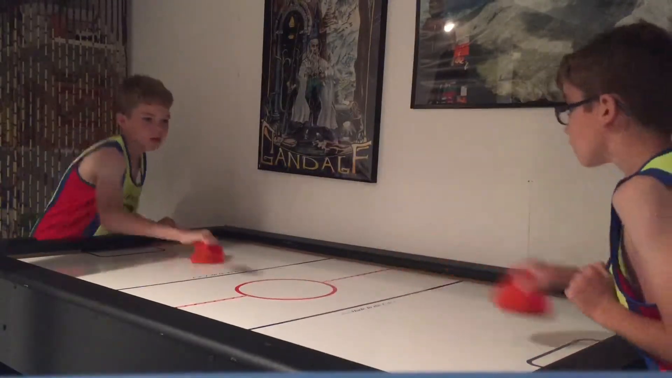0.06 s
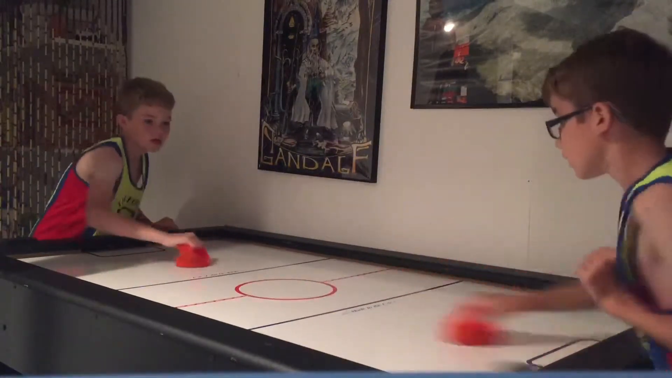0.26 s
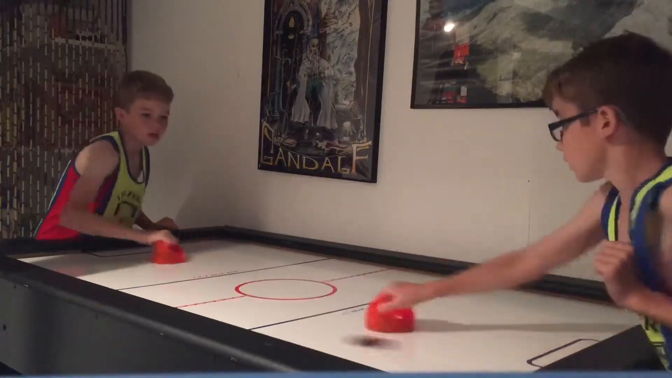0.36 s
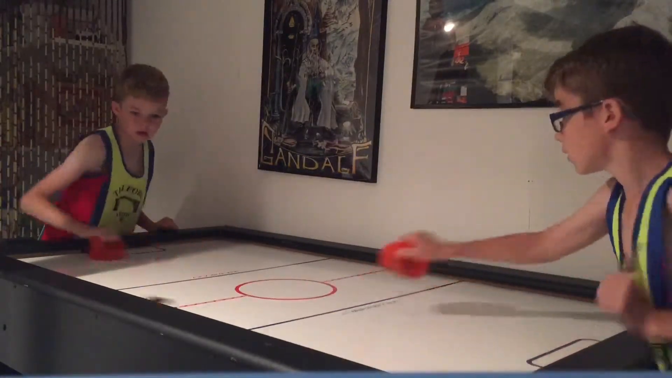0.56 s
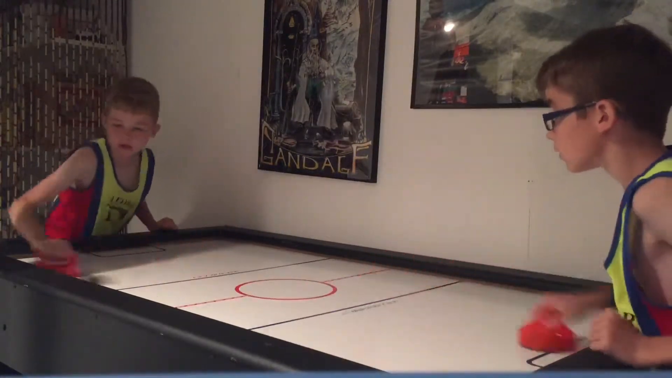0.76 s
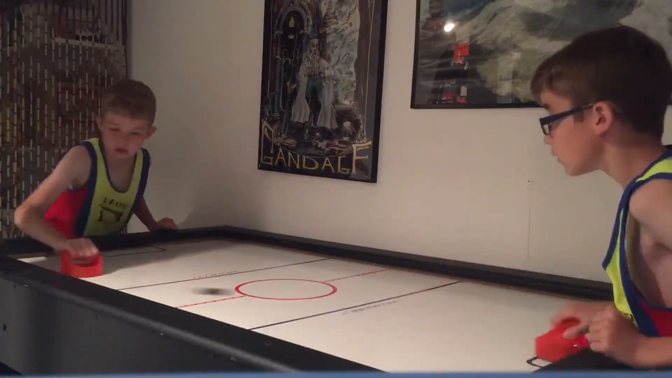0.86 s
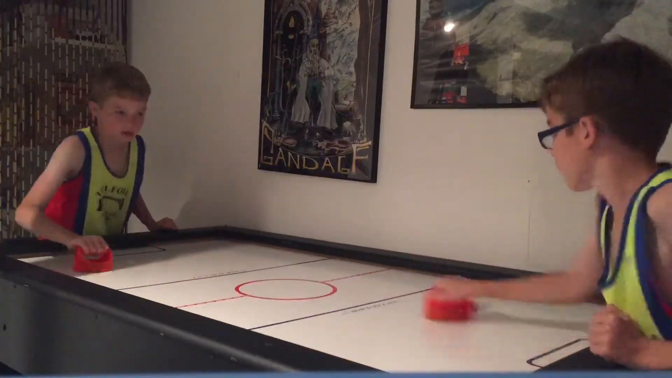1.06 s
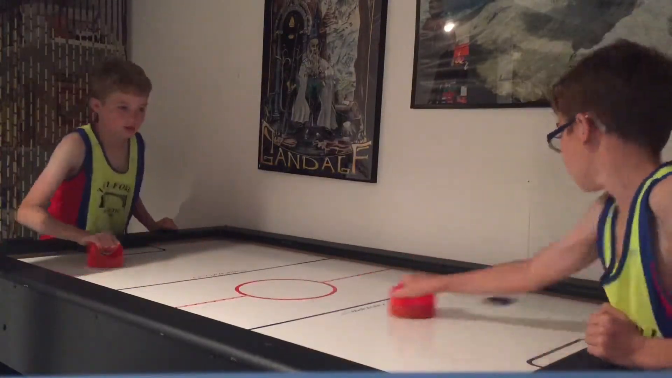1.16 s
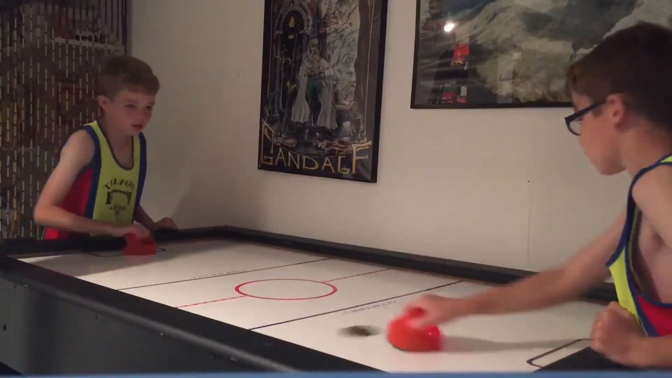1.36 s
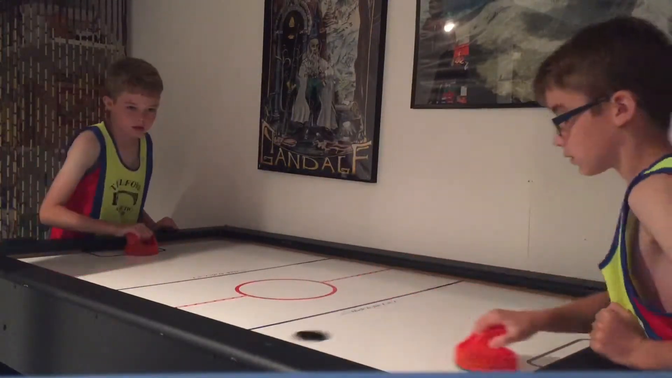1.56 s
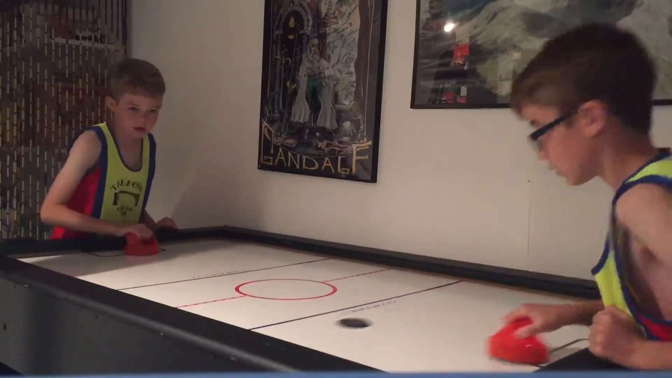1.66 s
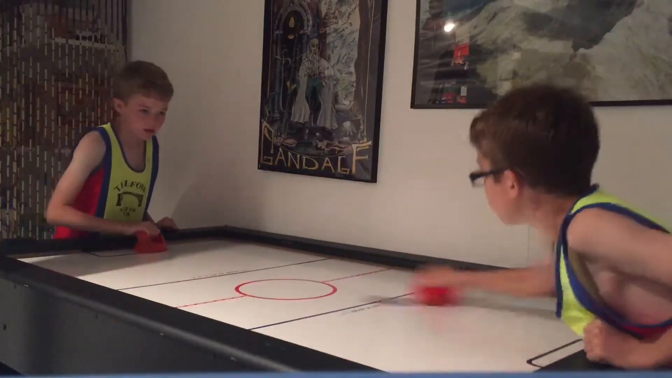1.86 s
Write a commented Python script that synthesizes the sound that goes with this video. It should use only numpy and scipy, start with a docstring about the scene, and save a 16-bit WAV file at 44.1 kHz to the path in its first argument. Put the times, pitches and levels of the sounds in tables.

```python
"""Air hockey in a hard-walled room.

A plastic puck is struck by mallets and bounces off the rails of an air table.
Every blow rings the cabinet, bed, rail, mallet and puck for an instant; the room draws it out.
The blower hisses and hums below, and the loudest blows overload the microphone."""
import sys
import numpy as np
from scipy import signal
from scipy.fft import rfft, irfft
from scipy.io import wavfile

SR = 44100
rng = np.random.default_rng(int(sys.argv[2]) if len(sys.argv) > 2 else 0)


def digitize_waveform(pressure):
    """Quantize a signal to 16-bit integers and store it at the path in sys.argv[1].

    Rows of a 2-D input are taken as channels; values are limited to [-1, 1].
    """
    field = np.atleast_2d(pressure).T
    bounded = np.clip(field, -1, 1)
    quanta = np.round(bounded * 32767).astype(np.int16)
    wavfile.write(sys.argv[1], SR, quanta)


N = 83790


def from_db(db):
    return 10 ** (np.asarray(db) / 20)


def unit_rms(x):
    return x / np.sqrt(np.mean(x ** 2) + 1e-20)


def at_hz(curve, hz):
    curve_hz, values = np.transpose(curve)
    return np.interp(np.log(hz), np.log(curve_hz), values)


def butter(x, kind, hz, order):
    return signal.sosfilt(signal.butter(order, hz, kind, fs=SR, output="sos"), x)


# Air hiss spectrum. Each row: frequency in Hz, relative level in dB.
HISS_SPECTRUM = [(30, -17), (130, 0), (250, -8), (470, 2), (700, 1.5), (1270, -0.5), (2500, -3), (3600, -8),
                 (4900, -22.5), (8100, -31), (12000, -40.5), (16000, -43)]
HISS_DB, HUM_DB, HUM_HZ, HUM_HALF_WIDTH_HZ = -37, -53.5, 90, 21


def blower():
    """Air hisses through the bed; the motor's wavering hum is a narrow band of noise."""
    hz = np.arange(N // 2 + 1) * SR / N + 1
    hiss = irfft(rfft(rng.standard_normal(N)) * from_db(at_hz(HISS_SPECTRUM, hz)), N)
    hum_band = 1 / (1 + ((hz - HUM_HZ) / HUM_HALF_WIDTH_HZ) ** 4)
    hum = irfft(rfft(rng.standard_normal(N)) * hum_band, N)
    return from_db(HISS_DB) * unit_rms(hiss) + from_db(HUM_DB) * unit_rms(hum)


# Room decay. Each row: frequency in Hz, t60 in seconds.
ROOM_DECAY = [(60, 0.82), (200, 0.73), (600, 0.51), (2000, 0.65), (5000, .7), (8000, 0.66), (11500, 0.43),
              (16000, 0.5)]
ROOM_RISE_S, ROOM_RISE_CYCLES = 0.015, 0.8


def room_tail():
    """The room's diffuse response builds and dies band by band; the bass builds later."""
    t = np.arange(SR) / SR
    white = rng.standard_normal((2, SR))
    edges_hz = 40 * 2 ** np.arange(0, 9.1, 0.75)
    tail = np.zeros(SR)
    for k, (low, high) in enumerate(zip(edges_hz, edges_hz[1:])):
        hz = np.sqrt(low * high)
        band = butter(white[k % 2], "band", [low, high], order=2)
        rise = 1 - np.exp(-t / (ROOM_RISE_S + ROOM_RISE_CYCLES / hz))
        tail += band * rise * from_db(-60 * t / at_hz(ROOM_DECAY, hz))
    return tail


ECHOES_PER_S, ECHO_RISE_S, DIRECT_DB = 5000, 0.0023, 14


def near_response(t60):
    """The direct sound, then a bright burst of reflections off the bed and the corner."""
    t = np.arange(SR) / SR
    arrivals = rng.random(SR) < ECHOES_PER_S / SR
    echoes = rng.standard_normal(SR) * arrivals * np.sqrt(SR / ECHOES_PER_S)
    rise = 1 - np.exp(-t / ECHO_RISE_S)
    near = echoes * rise * from_db(-60 * t / t60)
    near[0] = from_db(DIRECT_DB)
    near = butter(near + 1e-18, "high", hz=200, order=2)
    treble = butter(near, "high", hz=8000, order=1)
    return near + treble


def struck_body(modes, scatter_db=2, samples=8192):
    """A body rings as decaying sines of total energy 1; each blow excites them a little differently."""
    t = np.arange(samples) / SR
    hz, db, t60 = np.transpose(modes)[:, :, None]
    db = db + scatter_db * rng.standard_normal((8, 1))[:len(hz)]
    polarity = (-1.0) ** np.arange(len(hz))[:, None]
    envelopes = from_db(db - 60 * t / t60) / np.sqrt(t60)
    ring = np.sum(polarity * envelopes * np.sin(2 * np.pi * hz * t), axis=0)
    ring = butter(ring, "high", 0.75 * hz.min(), order=4)
    return ring / np.sqrt(np.sum(ring ** 2))


# Modes of the struck parts. Each row: frequency in Hz, relative level in dB, t60 in seconds.
CABINET_MODES = [(63, 11.5, 0.06), (83, 9.5, .12), (110, -24.5, .08)]
BED_MODES = [(162, -20, 0.027), (180.4, 3, 0.076), (228, -20, 0.023), (279.6, 6, 0.023), (359.7, 11, 0.06)]
RAIL_MODES = [(414, -4, 0.054), (491.4, 0.5, .04), (575.6, 6.5, 0.018), (639, 8, .04), (689, -0.5, 0.053)]
MALLET_BASE_MODES = [(759, -0.59, 0.0069), (1080, 0.94, 0.0067), (1176, -4.4, 0.06), (1544, -3, 0.0075)]
MALLET_MODES = [(1646, -5.5, 0.004), (2103, -3, 0.036), (2112, 5.5, 0.009), (2783, 2.5, 0.0036)]
PUCK_CLACK_MODES = [(2856, 8.5, 0.0074), (3111, 5.5, 0.0064), (3855, 0, 0.011), (3840, 2.5, 0.0021),
                    (4170, -3, .003)]
PUCK_RING_MODES = [(5630, -20, 0.0042), (6324, 22, .014), (6920, 25, 0.0091), (9690, 24.5, 0.0055),
                   (13300, -11, .006), (15700, -25, .005)]
CRACK_MODES = [(4170, 0.5, 0.0005), (5900, -2, 0.0013), (8300, -7, 0.0007), (10190, -3.5, 0.00035),
               (15100, -8, 0.00038)]
# Blows of the puck. Each row: start in seconds, levels in dB of cabinet, bed, rail, mallet base,
# mallet, puck clack, puck ring and crack, near sound over room in dB, near t60 in seconds.
PUCK_BLOWS = [(0.1056, -26, -16.5, -31.5, -21.5, -18, -18.5, -24, -22, 14.5, 0.035),
              (0.3196, -62, -27.5, -17, -12, -10, -24, -39.5, -27, 7.5, 0.048),
              (0.7717, -55, -47, -29, -27.5, -42, -52, -57, -60, 5, 0.046),
              (0.7911, -25, -15.5, -13.5, -16, -23, -38, -52.5, -23, 3, 0.021),
              (0.7938, -58, -59, -26.5, -22.5, -18, -16.5, -25.5, -24, 16, 0.039),
              (0.876, -38, -40, -22, -59, -49, -54, -60, -30, -16, 0.033),
              (1.128, -53, -25, -32, -25.5, -26, -23.5, -43, -34.5, 13, 0.025),
              (1.1871, -51, -56, -13, -14.5, -11, -15.5, -34, -27.5, 7, 0.06),
              (1.5408, -52, -47.5, -30.5, -23.5, -38, -28, -49.5, -41, 15.5, 0.013),
              (1.5472, -56, -48, -30, -33, -40.5, -32, -45, -47, 3, 0.019),
              (1.5443, -59, -41, -21, -26, -15.5, -31.5, -49, -42, 11.5, 0.028)]


def puck_blows():
    """Each blow rings table, mallet and puck, and sounds through the room from its own spot."""
    bodies = (CABINET_MODES, BED_MODES, RAIL_MODES, MALLET_BASE_MODES, MALLET_MODES,
              PUCK_CLACK_MODES, PUCK_RING_MODES, CRACK_MODES)
    out = np.zeros(N + 2 * SR)
    for start_s, *levels_db, near_db, near_t60 in PUCK_BLOWS:
        blow = sum(from_db(db) * struck_body(modes) for db, modes in zip(levels_db, bodies))
        response = room_tail() + from_db(near_db) * near_response(near_t60)
        in_room = signal.fftconvolve(blow, response)
        start = int(start_s * SR)
        out[start:start + len(in_room)] += in_room
    return out[:N]


def scene():
    """Puck blows over the blower, in mono."""
    return (puck_blows() + blower())[None]


BASS_CUT_HZ, TOP_CUT_HZ, OVERLOAD_CEILING = 58, 16450, 0.92


def record(dry):
    """The microphone drops the deep bass, flattens the peaks and cuts the top."""
    thinned = butter(dry, "high", BASS_CUT_HZ, order=3)
    flattened = thinned / (1 + np.abs(thinned / OVERLOAD_CEILING) ** 4) ** (1 / 4)
    return signal.sosfilt(signal.cheby2(18, 70, TOP_CUT_HZ, fs=SR, output="sos"), flattened)


dry = scene()
out = record(dry)
digitize_waveform(out)
```